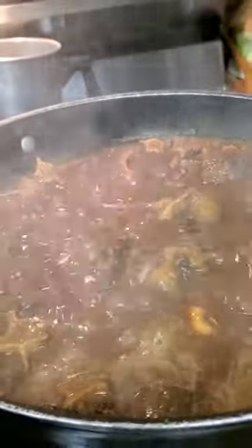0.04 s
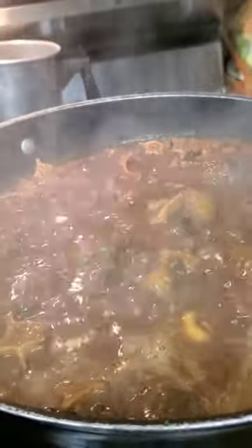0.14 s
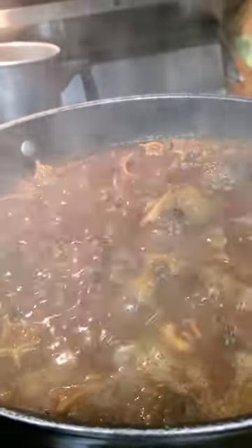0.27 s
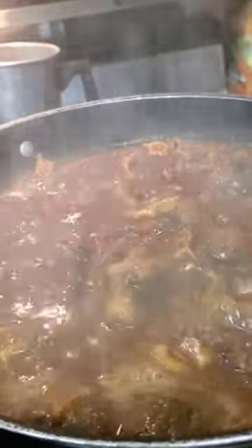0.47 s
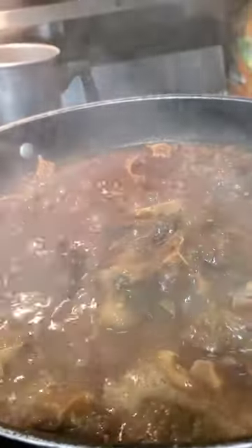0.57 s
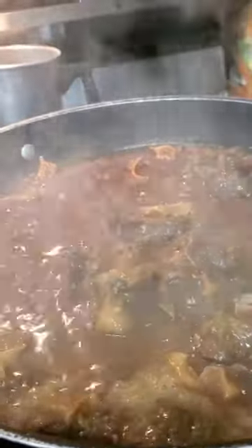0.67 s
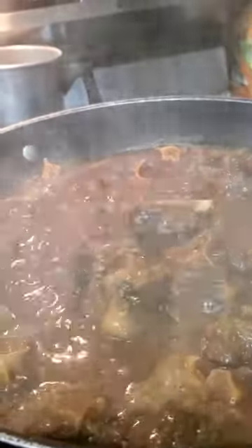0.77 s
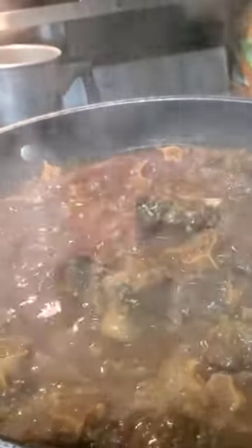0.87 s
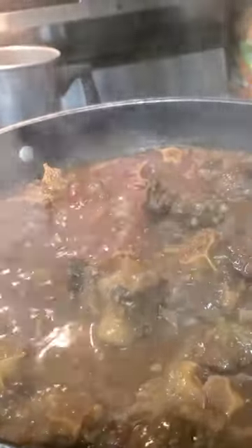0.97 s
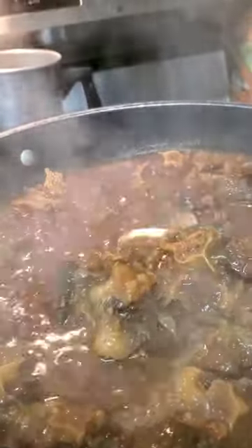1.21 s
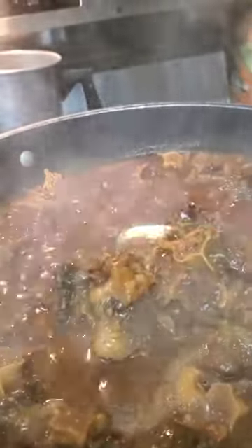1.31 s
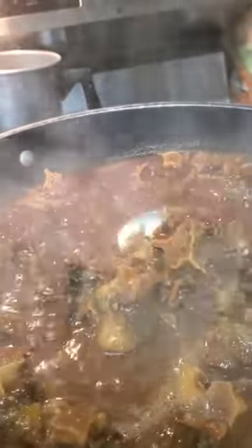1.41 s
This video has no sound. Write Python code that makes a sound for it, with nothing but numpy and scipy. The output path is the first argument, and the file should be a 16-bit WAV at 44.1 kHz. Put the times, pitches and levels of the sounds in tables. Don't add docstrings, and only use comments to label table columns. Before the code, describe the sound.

Thick gravy bubbling and plopping in a wide pan, one hard utensil knock, soft burner hiss

```python
import sys
import numpy as np
from scipy import signal
from scipy.fft import rfft, irfft, next_fast_len
from scipy.io import wavfile
from scipy.ndimage import uniform_filter1d, map_coordinates

SR = 44100
rng = np.random.default_rng(int(sys.argv[2]) if len(sys.argv) > 2 else 0)


def elevation(decibels):
    levels = np.asarray(decibels, float)
    return 10 ** (levels / 20)


def dump_mix(stems):
    frames = np.atleast_2d(stems).T
    limited = np.clip(frames, -1, 1)
    pcm = np.round(limited * 32767).astype(np.int16)
    wavfile.write(sys.argv[1], SR, pcm)


N = 63945

# start in seconds, peak level in dB, pitch in Hz, life in cycles.
DEEP_PLOPS = [(0.007, -37, 790, 3.4), (0.0343, -36.5, 760, 12), (0.0448, -41, 742, 17),
              (0.0588, -34.5, 659, 24), (0.0676, -39, 944, 12.5), (0.0837, -36, 620, 6.3),
              (0.1622, -27, 645, 2.5), (0.1922, -47, 620, 17), (0.2082, -37, 720, 2.4),
              (0.36, -42, 710, 12), (0.4195, -25.5, 700, 1.4), (0.4332, -39.5, 614.3, 7.9),
              (0.5063, -36, 582, 11), (0.6287, -40.5, 797, 21), (0.6566, -37.5, 663, 14),
              (0.6651, -37.5, 780, 11), (0.7562, -35, 720, 8), (0.7709, -30.5, 694, 3.7),
              (0.8044, -40.5, 541.5, 21), (0.8918, -36, 700, 8.1), (0.9227, -29, 680, 3.5),
              (0.9771, -25, 683, 4.6), (0.9949, -33.5, 574, 6), (1.021, -40, 697, 6),
              (1.0387, -30.3, 734, 2.5), (1.0452, -27.5, 720, 3.1), (1.1224, -28, 670, 3.7),
              (1.1663, -35.5, 710, 4), (1.3427, -30.5, 1005, 8), (1.4316, -33, 680, 3.8)]
# start in seconds, peak level in dB, pitch in Hz, life in cycles.
BRIGHT_PLIPS = [(0.0085, -29.5, 2250, 3.9), (0.028, -30, 1120, 2.4), (0.0578, -31.5, 3380, 6.2),
                (0.2085, -29.5, 1360, 4.5), (0.363, -33, 2510.0, 2.9), (0.366, -25, 1500.0, 2.8),
                (0.4817, -36.5, 1080, 12), (0.504, -33, 1230, 5.3), (0.5134, -31, 1260, 11),
                (0.587, -36, 2240.0, 2.5), (0.5953, -27.5, 1640, 6), (0.6015, -31, 1210, 4.2),
                (0.619, -33, 1650, 4.7), (0.6785, -29, 1180, 2.6), (0.6895, -35, 1830, 6.6),
                (0.749, -33.5, 1440, 6), (0.906, -28, 1510, 4.6), (0.922, -29, 1300, 1.9),
                (0.939, -37, 1120, 9.7), (0.9585, -33, 1276, 8.3), (0.9665, -38, 1300, 6),
                (.57, -41, 1680, 6), (.609, -35, 1750, 5.6), (.631, -43, 1600, 5), (.534, -40, 2100, 5),
                (0.9643, -32, 3340.0, 4), (0.9949, -36, 1290, 8.4), (1.0122, -32.5, 1110, 6.7),
                (1.023, -33, 1230, 7.3), (1.0345, -21.5, 910, 1.8), (1.0388, -23.5, 1980, 9.5),
                (1.0471, -28, 3800, 14.5), (1.0415, -31.5, 2570, 8), (1.128, -37.5, 960, 5.6),
                (1.348, -39, 1050, 6), (1.077, -27, 1290, 3.2), (1.1607, -32.5, 1320, 6),
                (1.1773, -35.5, 1290, 8.4)]
# start in seconds, peak level in dB, pitch in Hz, life in cycles.
SKIN_SNAPS = [(0.46, -26, 670, 1.7), (.5036, -21, 800, 1.2), (0.5123, -21, 680, 2.1),
              (0.75, -26.5, 960, 1.4), (.8275, -31, 560, 2), (0.9071, -29, 650, 1.5), (1.1601, -28, 630, 2),
              (1.262, -34.5, 660, 2.6), (1.3035, -35, 900, 1.1), (1.0038, -20, 620, 1.1),
              (.9955, -30, 620, 1.6), (.9785, -34, 600, 1.5)]
# start in seconds, peak level in dB, pitch in Hz, life in cycles.
QUIET_BLUBS = [(.464, -42, 780, 8.7), (.538, -34, 650, 4.1), (.551, -43, 750, 4.6),
               (.5875, -36.5, 580, 4.5), (.594, -39, 830, 5.1), (.61, -39.5, 506, 7.2),
               (.678, -38, 700, 5.9), (.734, -38, 740, 5.9), (.799, -38, 800, 6), (.817, -40, 616, 7),
               (.878, -52, 640, 5), (.888, -38, 1160, 7.4), (.931, -40, 650, 6), (1.013, -36, 700, 5),
               (1.06, -43, 643, 4.9), (1.083, -46, 594, 5.4), (1.105, -44, 694, 5.2),
               (1.205, -37, 593, 5.2), (1.227, -42.5, 640, 5.6), (1.244, -40, 670, 9),
               (1.267, -37.5, 673, 3.4), (1.318, -42, 510, 4.3), (1.37, -41, 1400, 6.5),
               (1.394, -42, 550, 6.7), (1.44, -42, 810, 8)]
# start in seconds, peak level in dB, pitch in Hz.
SMALL_POPS = [(0.83, -35.5, 1270), (1.2, -40, 640), (1.26, -36.5, 1250), (1.316, -37, 1390),
              (1.3398, -31.5, 840), (1.397, -35.5, 1480), (1.414, -38.5, 1250)]
# time in seconds, strength in dB.
BOIL_STRENGTH = [(0, -47), (.09, -54.5), (.13, -53), (.2, -48.5), (.44, -51.5), (.52, -51.5), (.6, -48.5),
                 (0.702, -52), (.86, -55), (.9, -53.5), (1.03, -52), (1.1, -55), (1.25, -57), (1.3, -56),
                 (1.45, -57)]
# frequency in Hz, density in dB per Hz.
SIMMER_COLOUR = [(88, -37), (150, -1.5), (229, -3), (358, -33), (639, -1), (1320, -13.5), (2300, -10),
                 (3500, -10.5), (4550, -13), (7700, -120)]
# start in seconds, peak level in dB.
DROPLET_SPITS = [(0.655, -18), (0.993, -15.5), (1.0458, -19)]

# pitch in Hz, level in dB, t60 in seconds, left over right in dB.
UTENSIL_MODES = [(803, -3, 0.025, -6), (1105, 5.5, 0.012, 8), (1340, -10, 0.025, -9.5),
                 (1965, -2, 0.019, -3.5), (2295, 8, 0.004, 9.5), (2790, -18, 0.0062, -46),
                 (3320, -3.5, 0.0092, -13.5), (4210, -6.5, 0.0054, -16.5), (4720, -22, 0.019, -5),
                 (5550, -18, 0.015, 15)]
# pitch in Hz, level in dB, t60 in seconds, left over right in dB.
COUNTER_MODES = [(124, -36, 0.31, 1), (255, -39.5, 0.31, -6), (318, -35, 0.47, 1.5), (410.5, -30, 0.32, -3),
                 (529, -21.5, .07, 4), (777, -38, 0.57, -6), (850, -40, 0.32, 6)]
# start in seconds, peak level in dB, pitch in Hz, life in cycles.
BLOW_BODY = [
    (.2215, -36, 1000, 5.4),
    (0.2277, -25.5, 172, 2.3),
    (.231, -25, 516, 5.6),
]
# start in seconds, level in dB, pitch in Hz, life in cycles.
WALL_BURSTS = [(.2305, -12, 1640, 5), (.2335, -17, 900, 8), (.229, -20, 480, 5), (.2285, -19, 6000, 4)]
# start in seconds, level in dB under the first knock.
FAR_KNOCKS = [(.296, -24), (.332, -25.5), (.51, -33), (0.528, -43), (0.564, -34.5), (0.584, -41)]

# frequency in Hz, density in dB per Hz.
HISS_COLOUR = [(1180, -2.5), (2000, -4.5), (2560, -11.5), (2760, -8.5), (3950, -7), (5780, 0), (9040, -9),
               (11500, -12), (14500, -10)]
# frequency in Hz, left over right in dB.
HISS_LEAN = [(2000, 2.5), (5000, 1.5), (9000, 8.5), (12000, 5.5)]
# frequency in Hz, density in dB per Hz.
RUMBLE_COLOUR = [(13, -53.5), (22, -21), (38, -4), (59, 3.5), (92, 2.5), (113, -16.5), (300, 2.5),
                 (390, -7.5), (660, -120)]
# centre in Hz, width in Hz, level in dB.
HUM_BANDS = [(72.6, 6.9, -71), (115, 9.1, -65)]
# frequency in Hz, t60 in seconds.
KITCHEN_DECAY = [(100, 0.69), (400, 0.6), (800, 0.44), (2000, 0.34), (4000, 0.21), (8000, 0.27)]
# frequency in Hz, correlation from -1 to 1.
PORT_LIKENESS = [(60, 0.83), (180, 1), (550, 0.22), (1650, -0.048), (4970, -0.04), (15000, -0.046)]

KNOCK_S = 0.2274


def gravy():
    when, level = np.transpose(BOIL_STRENGTH)
    strength = elevation(np.interp(np.arange(N) / SR, when, level))
    pops = [(*row, 5) for row in SMALL_POPS]
    families = (DEEP_PLOPS, BRIGHT_PLIPS, SKIN_SNAPS, QUIET_BLUBS, pops)
    bursts = sum(bubbles(*np.transpose(rows)) for rows in families)
    bed_db, simmer_db = -3.5, -0.5
    simmer = rush(lambda hz: elevation(along(SIMMER_COLOUR, hz)), patchy_db=2.5)
    return at_pan(bursts + elevation(bed_db) * strength * bubble_bed()) + elevation(simmer_db) * strength * simmer


def bubble_bed():
    count = round(900 * N / SR)
    spot, size, pitch = rng.random((count, 3)).T
    hz = np.clip(507 / (1 - pitch) ** 0.383, 400, 3000)
    db = np.minimum(-4.5 * np.log(1 - size), 9)
    cycles = 2.76 * np.exp(0.3 * rng.standard_normal(count))
    return unit(bubbles(spot * N / SR, db, hz, cycles))


def bubbles(s, db, hz, cycles):
    pitch_rise, burst_cycles = 0.074, 0.42
    t = np.arange(1200) / SR
    turns = np.asarray(hz)[:, None] * t
    life = np.asarray(cycles)[:, None]
    tone = np.sin(2 * np.pi * turns * (1 + pitch_rise * turns / life / 2))
    wave = tone * elevation(-60 * turns / (2 * life)) * (1 - np.exp(-turns / burst_cycles))
    at = np.round(np.asarray(s) * SR).astype(int)[:, None] + np.arange(len(t))
    return np.bincount(at.ravel(), (elevation(db)[:, None] * wave).ravel(), N + len(t))[:N]


def spits():
    x, t = np.zeros(N + SR), np.arange(600) / SR
    for s, db in DROPLET_SPITS:
        start = round(s * SR)
        x[start:start + len(t)] += elevation(db - 14 - 60 * t / 0.0043) * rng.standard_normal(len(t))

    def bright(hz):
        lift = (hz / 5000) ** 2
        return lift / (1 + lift) / (1 + (hz / 10500) ** 8)

    return at_pan(filtered(x[:N], bright))


def at_pan(x):
    left_db, lead_s, room_db = 7, 0.0001, -9.5
    side = np.array([[1], [-1]])
    near = filtered(x, lambda hz: elevation(side * left_db / 2) * np.exp(1j * np.pi * hz * side * lead_s))
    return near + elevation(room_db) * room(x, 0.31, size=SR // 3)


def knock():
    knock_db, rattle_db, near_room_db, late_room_db = -6, 2, -12, -13
    t = np.arange(SR // 4) / SR
    utensil, counter = np.zeros((2, 2, N))
    flutter = [2 * rattle_db * wobble(59)[:len(t)] for _ in COUNTER_MODES]
    for port, side in enumerate((0.5, -0.5)):
        start = round((KNOCK_S + 0.00016 * (side > 0)) * SR)
        utensil[port, start:start + len(t)] = elevation(knock_db) * utensil_ring(t, side)
        counter[port, start:start + len(t)] = elevation(knock_db) * counter_ring(t, side, flutter)
    blow = utensil[1] + bubbles(*np.transpose(WALL_BURSTS))
    near = elevation(near_room_db) * room(blow, 0.41, size=SR // 8)
    late = far_knocks(blow) + elevation(late_room_db) * room(blow, 1, size=SR // 2)
    direct = utensil + counter + bubbles(*np.transpose(BLOW_BODY))
    return direct + near + elevation(rattle_db * wobble(138.7)) * late


def utensil_ring(t, side):
    ring = np.zeros(len(t))
    sign = -1
    for hz, db, t60, pan in UTENSIL_MODES:
        swell = (1 - np.exp(-t * hz / 1.15)) ** 2
        ring += sign * elevation(db + side * pan - 60 * t / t60) * swell * np.sin(2 * np.pi * hz * t)
        sign = -sign
    low_pass = signal.butter(4, 7500, fs=SR, output="sos")
    crack = signal.sosfilt(low_pass, rng.standard_normal(len(t)))
    crack_db = -13.5 + 3.6 * side - 60 * t / 0.023
    return ring + elevation(crack_db) * (1 - np.exp(-t / 0.00015)) * crack


def counter_ring(t, side, flutter):
    ring = np.zeros(len(t))
    for (hz, db, t60, pan), shake in zip(COUNTER_MODES, flutter):
        ring += elevation(db + side * pan - 60 * t / t60 + shake) * np.sin(2 * np.pi * hz * t)
    return ring * (1 - np.exp(-t / 0.002))


def far_knocks(blow):
    far = np.zeros((2, N))
    for s, db in FAR_KNOCKS:
        far += elevation(db) * room(np.roll(blow, round((s - KNOCK_S) * SR)), 0.66, size=SR // 3)
    return far


def burner():
    fry_s, fry_width_s, fry_db = 1.397, 0.012, 6
    fry = fry_db * np.exp(-((np.arange(N) / SR - fry_s) / fry_width_s) ** 2)
    level = elevation(-51.5 + 0.47 * wobble(13.9) + fry)
    hiss = level * rush(lambda hz: elevation(along(HISS_COLOUR, hz)), patchy_db=1.75)
    return filtered(hiss, lambda hz: elevation(np.array([[0.5], [-0.5]]) * along(HISS_LEAN, hz)))


def rumble():
    return elevation(-58.5) * rush(lambda hz: elevation(along(RUMBLE_COLOUR, hz)), patchy_db=2)


def hum():
    total = np.zeros((2, N))
    for centre, width, db in HUM_BANDS:
        total += elevation(db) * rush(lambda hz: 1 / (1 + (2 * (hz - centre) / width) ** 2), patchy_db=3.5)
    return total


def room(x, share, size):
    first_wall_s = 0.004
    hz, t, z = signal.stft(rng.standard_normal((2, size)), SR, nperseg=128)
    t60 = share * along(KITCHEN_DECAY, hz)[:, None]
    tail = signal.istft(z * elevation(-60 * t / t60), SR, nperseg=128)[1]
    tail = paired(tail, np.ones_like)[:, :size]
    delayed = np.pad(x, (round(first_wall_s * SR), 0))[None]
    return signal.fftconvolve(delayed, tail / np.linalg.norm(tail[0]), axes=1)[:, :N]


def rush(gain, patchy_db):
    z = signal.stft(rng.standard_normal((2, N)), nperseg=512)[2]
    field = uniform_filter1d(rng.standard_normal(z.shape[1:]), size=6, axis=0)
    field = uniform_filter1d(field, size=8, axis=1)
    noise = signal.istft(z * elevation(patchy_db * unit(field)), nperseg=512)[1][:, :N]
    return paired(noise, gain)


def paired(pair, gain):
    def turn(hz):
        return np.arccos(np.clip(along(PORT_LIKENESS, hz), -1, 1)) / 2

    mid, side = filtered(pair, lambda hz: gain(hz) * [np.cos(turn(hz)), np.sin(turn(hz))])
    return unit(np.array([mid + side, mid - side]))


def filtered(x, response):
    m = next_fast_len(N + SR // 2)
    return irfft(rfft(x, m) * response(np.fft.rfftfreq(m, 1 / SR)), m)[..., :N]


def wobble(rate):
    knots = rng.standard_normal(int(N * rate / SR) + 4)
    return map_coordinates(knots, [np.arange(N) * rate / SR])


def along(points, hz):
    f, v = np.transpose(points)
    return np.interp(np.log(hz + 1), np.log(f + 1), v)


def unit(x):
    return x / np.sqrt(np.mean(x ** 2) + 1e-20)


def scene():
    return gravy() + spits() + knock() + burner() + rumble() + hum()


def top_cut(x):
    return signal.sosfilt(signal.butter(12, 15790, fs=SR, output="sos"), x)


def record(dry):
    top_hz, bass_hz = 14700, 33
    band = filtered(dry, lambda hz: (hz < top_hz) * hz ** 2 / (hz ** 2 + bass_hz ** 2))
    duck_hz, duck_db, duck_s, release_s = 8800, -7, 0.238, 0.09
    after = np.arange(N) / SR - duck_s
    duck = elevation(duck_db * (after > 0) * np.exp(-(after / release_s) ** 2))
    mix = band + (duck - 1) * filtered(band, lambda hz: hz > duck_hz)
    return top_cut(mix)


dry = scene()
out = record(dry)
dump_mix(out)
```